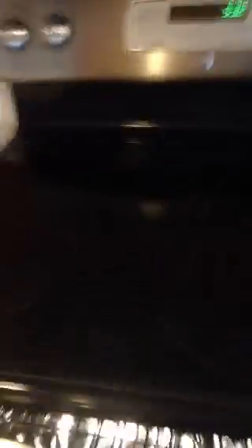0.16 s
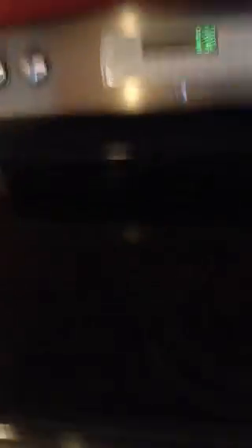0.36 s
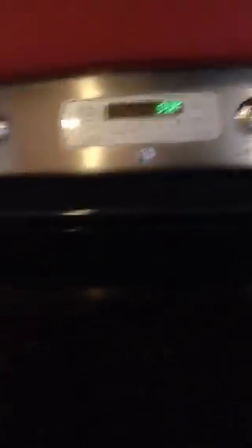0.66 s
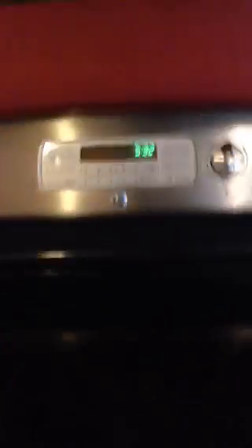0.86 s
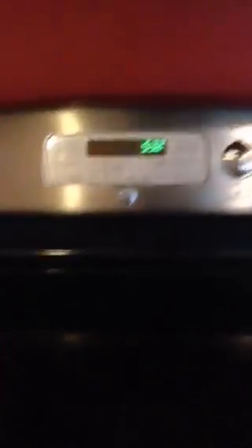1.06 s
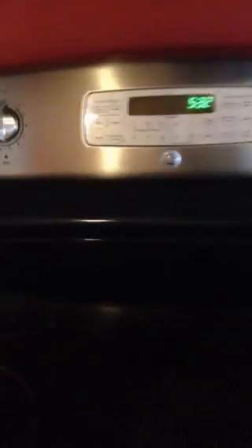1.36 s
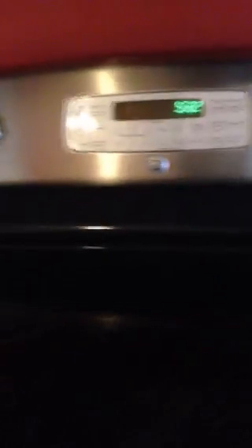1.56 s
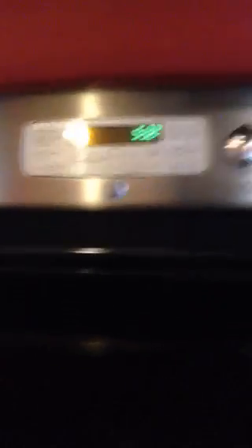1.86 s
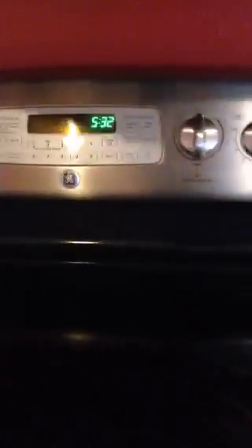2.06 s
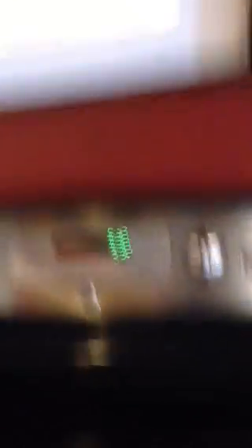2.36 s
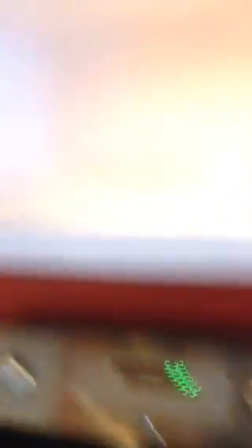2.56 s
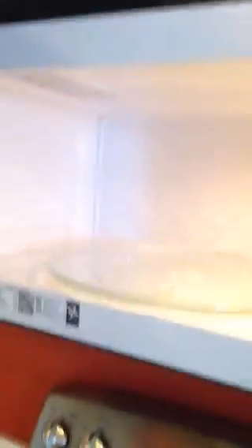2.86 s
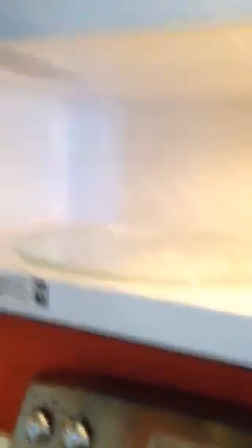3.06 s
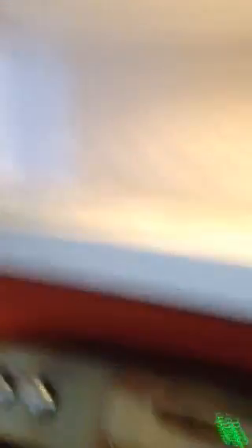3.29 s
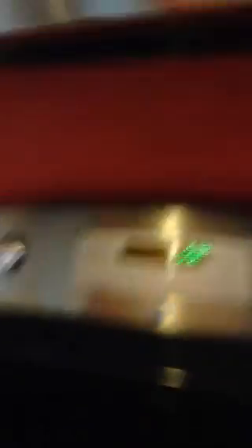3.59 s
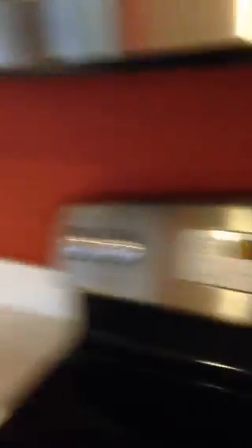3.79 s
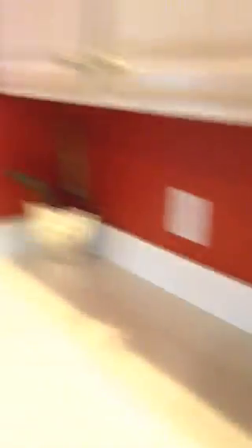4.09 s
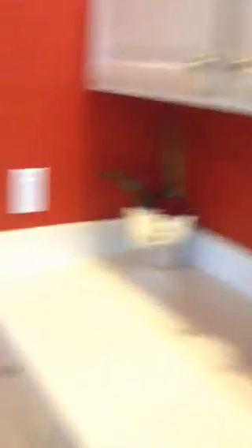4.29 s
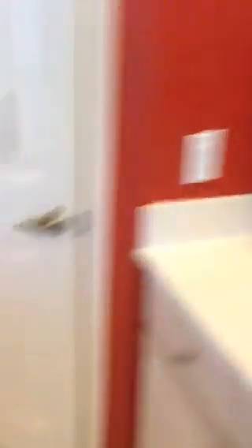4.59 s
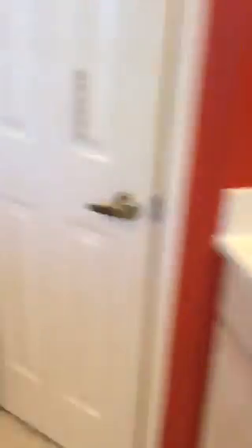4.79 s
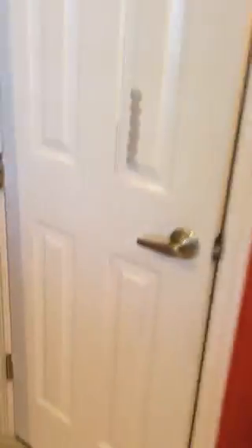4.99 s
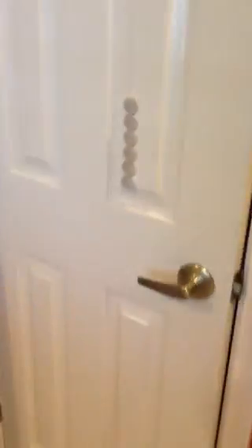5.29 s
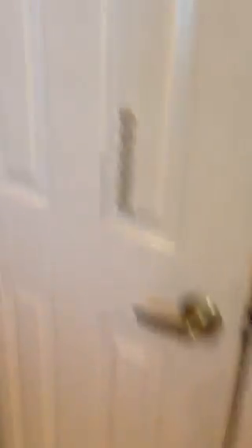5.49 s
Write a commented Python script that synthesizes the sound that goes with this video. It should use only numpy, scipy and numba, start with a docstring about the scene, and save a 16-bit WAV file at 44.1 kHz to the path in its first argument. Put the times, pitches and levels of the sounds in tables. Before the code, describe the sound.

In a small hard-walled kitchen, an oven door scrapes and thuds shut, then a microwave door clatters open and slams loudly.

```python
"""Low handling rumble, appliance hum and air noise come first, in a small, hard-walled kitchen.
An oven door scrapes on its hinge springs, clicks and thuds shut; a microwave door above is tugged, pops open
with a clatter and is slammed; a few light knocks follow. A blow is a crack and rattle of noise plus, on the
doors, decaying modes; sliding parts are random jolts, filtered or resonated. Room echoes surround them.
The microphone's gain ducks at high level and recovers slowly."""
import sys
import numpy as np
from scipy import signal
from scipy.fft import rfft, irfft
from scipy.io import wavfile
from numba import njit

SR = 44100
rng = np.random.default_rng(int(sys.argv[2]) if len(sys.argv) > 2 else 0)


def to_wav(sig):
    """Store sig (one row per channel, or 1-D mono) as 16-bit WAV at the path in sys.argv[1].

    Samples outside -1..1 are clipped; the rate is SR.
    """
    pcm = np.clip(np.atleast_2d(sig), -1, 1) * 32767
    pcm = np.round(pcm).astype(np.int16)
    wavfile.write(sys.argv[1], SR, pcm.T)  # frames by channels


N = 249165
TIME = np.arange(N) / SR  # s


def undb(db):
    """Amplitude ratio: decibels to gain."""
    return 10 ** (np.asarray(db) / 20)


def unit(x):
    """Power normalisation: scale to rms 1."""
    return x / np.sqrt(np.mean(x ** 2))


def at(points, hz):
    """Logarithmic interpolation: read (f/Hz, value) points on a log-frequency axis."""
    f, value = np.transpose(points)
    return np.interp(np.log(np.maximum(hz, 1)), np.log(f), value)


def fader(curve):
    """Level envelope: gain over time from (t/s, level/dB) rows, silent outside them."""
    return undb(np.interp(TIME, *np.transpose(curve), left=-np.inf, right=-np.inf))


def colour(x, points):
    """Spectral shaping: zero-phase filter with the gains of (f/Hz, level/dB) points."""
    hz = np.arange(len(x) // 2 + 1) * SR / len(x)
    return irfft(rfft(x) * undb(at(points, hz)), len(x))


def causal(gain):
    """Minimum phase: the tightest impulse response with these spectral gains, folded in the cepstrum."""
    cepstrum = irfft(np.log(gain))
    half = len(cepstrum) // 2
    folded = np.r_[cepstrum[0], 2 * cepstrum[1:half], np.zeros(half)]
    return irfft(np.exp(rfft(folded)))


def fade(t, t60):
    """Exponential decay: 60 dB down at t60."""
    return np.exp(-np.log(1000) * t / t60)


def ring(hz, t60):
    """Damped free vibration: one struck mode."""
    t = TIME[:int(t60 * SR)]
    return np.sin(2 * np.pi * hz * t) * fade(t, t60)


def add(out, s, sound):
    """Superposition: mix a sound in at time s."""
    start = int(s * SR)
    part = sound[:max(N - start, 0)]
    out[start:start + len(part)] += part


# Tones of the appliance hum, with loud and quiet spots in the room:
# (f/Hz, level/dB at the oven, level/dB at the microwave, level/dB by the wall door)
HUM_TONES = [(57.6, -65, -63, -74.5), (117, -69, -73, -64.5), (229, -72, -71, -81.5),
             (420, -80.5, -81, -87.5)]
# Where the microphone is carried: (t/s, spot: 0 oven, 1 microwave, 2 wall door)
MICROPHONE_WALK = [(1.5, 0.055), (3.0, 1.25), (3.9, 1), (4.7, 2.5)]
# Relative spectrum of the air noise: (f/Hz, level/dB per Hz)
AIR_SPECTRUM = [(20, -11.5), (35, -1), (60, 2.5), (90, -2), (140, -5.5), (200, -7), (320, -12), (550, -16),
                (900, -23), (2000, -23.5), (6000, -24.5), (15000, -27.5)]
# Low handling rumble: (t/s, level/dB)
HANDLING_LEVEL = [(0, -51.5), (.15, -65), (.3, -67.5), (1.2, -60), (2.4, -58.5), (2.7, -77), (4.5, -74.5),
                  (5.65, -76)]
AIR_DB = -62


def background():
    """Spatial variation of a sound field: hum changes along the walk, over steady air noise and rumble."""
    hum = 0
    spot = np.interp(TIME, *np.transpose(MICROPHONE_WALK))
    for hz, *levels in HUM_TONES:
        drift = np.interp(TIME, np.linspace(0, TIME[-1], num=24), rng.standard_normal(size=24))
        level_db = np.interp(spot, np.arange(len(levels)), levels) + 1.5 * drift
        phase = 2 * np.pi * hz * TIME + 0.28 * drift
        hum = hum + np.sqrt(2) * undb(level_db) * np.sin(phase)
    air = undb(AIR_DB) * unit(colour(rng.standard_normal(N), AIR_SPECTRUM))
    rumble_spectrum = [(25, -10.0), (60, -2.0), (130, 2.5), (300, -10.5),
                       (1000, -22.0), (4000, -39), (12000, -58)]
    rumble = unit(colour(rng.standard_normal(N), rumble_spectrum))
    return hum + air + rumble * fader(HANDLING_LEVEL)


# Reverberation time of the room: (f/Hz, T60/s)
REVERBERATION_TIME = [(60, 0.71), (150, 0.59), (400, 0.6), (1000, 0.93), (2500, 0.82), (5000, 0.78),
                      (8000, 0.41), (15000, 0.2)]
# Reverberant level against the direct sound: (f/Hz, level/dB)
REVERBERANT_LEVEL = [(40, -11), (130, -9), (300, -5.5), (1000, -10), (2500, -14.5), (6000, -11.5),
                     (14000, -14)]


def kitchen(x, build_s):
    """Diffuse reverberation: noise bands build up in milliseconds and decay at their own T60."""
    t = TIME[:SR]
    hz = np.arange(SR // 2 + 1)
    noise = rfft(rng.standard_normal(SR)) * undb(at(REVERBERANT_LEVEL, hz))
    centres = np.geomspace(60, 15000, num=20)
    tail = 0
    for share, t60 in zip(np.eye(len(centres)), at(REVERBERATION_TIME, centres)):
        band = irfft(noise * np.interp(hz, centres, share), SR)
        shape = fade(t, t60) * (1 - np.exp(-(t / build_s) ** 2))
        tail = tail + band * shape / np.linalg.norm(shape)
    return signal.fftconvolve(x, tail)[:N]


HARDNESS_PIVOT_HZ = 1275
CONTACT_OCTAVES = (-2.87, 2.65)  # range around the pivot in which hardness shapes a blow


def force(hz, hardness, arch_db):
    """Contact stiffness: soft contacts tip the force spectrum (dB) to bass, hard ones to treble.

    A parabola of arch_db per squared octave is subtracted from that slope."""
    octave = np.clip(np.log2(hz / HARDNESS_PIVOT_HZ), *CONTACT_OCTAVES)
    return hardness * octave - arch_db * octave ** 2


def clatter(t60, crack):
    """Multiple impact: a sharp crack and dying tiny bounces, their energy spread evenly over frequency."""
    t = TIME[:SR // 4]
    bounces = unit(rng.standard_normal(len(t)) * undb(3.5 * rng.standard_normal(len(t))))
    rattle = bounces * fade(t, t60)
    rattle[0] = crack
    white = irfft(np.exp(1j * np.angle(rfft(rattle))), len(t))  # keep only the phase
    even = white * fade(t, 4 * t60)
    return even * np.linalg.norm(rattle) / np.linalg.norm(even)


def blows(table, modes, panel, modes_db, crack, arch_db):
    """Impact excitation: each contact cracks, rattles the crowded panel modes and rings the strong ones."""
    out = np.zeros(N)
    hz = np.maximum(np.fft.rfftfreq(8192, 1 / SR), 20)
    per_octave = np.sqrt(SR / np.sqrt(2) / hz)  # equal energy in each octave
    for s, level, hardness, t60 in table:
        body = causal(per_octave * undb(level + force(hz, hardness, arch_db) + at(panel, hz)))
        add(out, s, signal.fftconvolve(clatter(t60, crack), body))
        for f, db, mode_t60 in modes:
            gain = undb(modes_db + db + level + force(f, hardness, arch_db))
            add(out, s, gain * ring(f, mode_t60))
    return out


def small_part(x, low_hz):
    """Radiation cutoff: a small part radiates little below its lowest resonance."""
    return signal.sosfilt(signal.butter(4, low_hz, "high", fs=SR, output="sos"), x)


# Light knocks across the room:
# (t/s, level/dB, hardness/dB per octave, nominal rattle T60/s, lowest f/Hz of the part struck)
KNOCKS = [(4.94, -69.5, 5, 0.13, 400), (4.9973, -52.5, -4.5, 0.11, 190), (5.0776, -44.5, 1, 0.12, 760),
          (5.549, -61, -5, .09, 190), (5.574, -66.5, 5, 0.077, 600), (5.645, -58, -5, 0.056, 190)]
# Relative colour of their rattle: (f/Hz, level/dB)
KNOCK_SPECTRUM = [(30, -16), (130, -2), (300, 1), (600, -3.5), (1200, -1), (2000, -7), (2550, 1),
                  (3000, -14), (7000, -1), (15000, -14)]


def light_knocks():
    """Impact without modal ringing: faint knocks and clicks with no cabinet boom."""
    total = 0
    for *contact, low_hz in KNOCKS:
        knock = blows([contact], [], KNOCK_SPECTRUM, modes_db=0, crack=8.1, arch_db=2.0)
        total = total + small_part(knock, low_hz)
    return total


def friction(rate, spread_db):
    """Stick-slip: dense, uneven random jolts, rate per second."""
    jolts = (rng.random(N) < rate / SR) * rng.standard_normal(N)
    return jolts * undb(spread_db * rng.standard_normal(N))


def stroke(table):
    """Exponential growth and decay: each stroke rises by 60 dB, holds and dies away."""
    effort = 0
    for s, db, rise, hold, release in table:
        growth = fade(np.maximum(s - TIME, 0), rise)
        decay = fade(np.maximum(TIME - s - hold, 0), release)
        effort = effort + undb(db) * growth * decay
    return effort


def rub(spectrum, strokes):
    """Sliding friction: coloured jolts that follow the effort of the strokes."""
    return unit(colour(friction(rate=5000, spread_db=1.5), spectrum)) * stroke(strokes)


# Stroke tables: (t/s at full strength, level/dB, 60 dB rise/s, hold/s, release T60/s)
# A hand brushing the door handle
BRUSH_STROKES = [(1.13, -57.5, 0.27, .025, 0.19)]
# Its relative spectrum: (f/Hz, level/dB per Hz)
BRUSH_SPECTRUM = [(300, -25), (1200, -12), (2200, 0.5), (4000, -6), (7000, -12), (15000, -18.5)]


def hand_brush():
    """Sliding friction of skin on the handle: a short, soft hiss."""
    return rub(BRUSH_SPECTRUM, BRUSH_STROKES)


# The microwave door swishing shut: stroke columns as above
SWING_STROKES = [(3.719, -66.5, .4, .01, 0.78), (3.998, -40.5, 0.13, .002, 0.023)]
# Its relative spectrum: (f/Hz, level/dB per Hz)
SWING_SPECTRUM = [(30, 11), (70, 0), (220, -6), (450, 1), (1000, -3.5), (2000, -2.5), (3000, -1.5),
                  (5000, -3), (9000, -15), (15000, -43.5)]


def door_swing():
    """Sliding friction of the closing door: a swish weighted to the bass."""
    return rub(SWING_SPECTRUM, SWING_STROKES)


# The microwave's latch hook, set shivering when the door is pushed: stroke columns as above
SHIVER_STROKES = [(3.831, -39.5, .005, .005, 0.25)]
# Its relative spectrum: (f/Hz, level/dB per Hz)
SHIVER_SPECTRUM = [(300, -34), (2800, -19), (4000, -2), (5100, 3), (5900, -5.5), (6800, -11),
                   (15000, -31.5)]


def latch_shiver():
    """Sliding friction in a small hook: a brief bright fizz."""
    return rub(SHIVER_SPECTRUM, SHIVER_STROKES)


# The microwave hinge as the door swings open: stroke columns as above
SQUEAK_STROKES = [(2.27, -66, .3, .02, 0.25), (2.375, -68, 0.093, 0.045, 0.11)]
SQUEAK_HZ, SQUEAK_T60_S = 2150, 0.032


def hinge_squeak():
    """Friction-excited resonance: slips keep one damped mode sounding."""
    slips = friction(rate=2700, spread_db=0.5)
    squeak = unit(signal.fftconvolve(slips, ring(SQUEAK_HZ, SQUEAK_T60_S))[:N])
    return stroke(SQUEAK_STROKES) * squeak


# Effort on the oven hinge, before the scrape and spring gains: stroke columns as above
OVEN_HINGE_STROKES = [(.55, -43.5, 0.28, 0.091, .6), (.91, -58, 0.3, 0.0065, 0.49),
                      (1.06, -59, 0.52, 0.0088, .9)]
# Relative spectrum of the scrape: (f/Hz, level/dB per Hz)
SCRAPE_SPECTRUM = [(30, -4.5), (60, 2), (180, 10), (400, 2), (800, -5), (1200, -7), (1450, -4.5), (2100, 2),
                   (2700, -6), (4200, -9), (5200, -14), (9000, -26), (15000, -31)]
# Modes of the hinge springs: (f/Hz, relative level/dB, T60/s)
HINGE_SPRING_MODES = [(1080, -5.5, 0.025), (1362, -1.5, 0.21), (1448, 1.5, 0.17), (1562, 5.5, 0.038),
                      (1714, 0, 0.031), (1847, 3, 0.03), (2040, 2, 0.073), (4330, -6, 0.015)]


def oven_hinge():
    """Friction-excited resonance: the hinge scrapes and its springs sing when pulled hard."""
    slips = friction(rate=2700, spread_db=0.5)
    effort = stroke(OVEN_HINGE_STROKES)
    springs = 0
    for f, db, t60 in HINGE_SPRING_MODES:
        springs = springs + undb(db) * unit(signal.fftconvolve(slips, ring(f, t60))[:N])
    scrape = undb(3.5) * unit(colour(slips, SCRAPE_SPECTRUM))
    # the springs fade faster than the scrape as effort drops
    singing = undb(1.5) * unit(springs) * np.sqrt(effort / effort.max())
    return effort * (scrape + singing)


# Thin steel parts that sing on after the pop and the slam: (t/s, f/Hz, level/dB, T60/s)
STEEL_RINGS = [(1.9243, 690.3, -65.5, 3.7), (4.031, 340.5, -46, 2.91)]


def after_rings():
    """Light damping: thin steel gives long, pure rings."""
    out = np.zeros(N)
    for s, hz, db, t60 in STEEL_RINGS:
        add(out, s, undb(db) * ring(hz, t60))
    return out


# Contact tables: (t/s, level/dB, hardness/dB per octave, nominal rattle T60/s)
# The oven door's small catch
CATCH_CONTACTS = [(.4396, -30, -1.5, 0.071)]
# The oven door meets its frame and jolts on its hinges
OVEN_CONTACTS = [(.459, -39.5, -1, 0.34), (.4665, -40, -3.5, 0.17), (.4932, -40, -1, 0.047),
                 (.548, -56.5, -5, 0.18), (.648, -57, -1, 0.39)]
# Strong modes of the oven: (f/Hz, relative level/dB, T60/s)
OVEN_STRONG_MODES = [(54.3, -17, 0.15), (90, 0, .09), (125, 12.5, 0.1), (214, 4, 0.062), (250, -1, 0.09),
                     (1950, -4, 0.12), (3900, 8, .03)]
# Relative colour of its dense panel rattle: (f/Hz, level/dB)
OVEN_PANEL = [(30, -5), (70, 11), (140, -3), (240, 7.5), (380, -11), (600, -3.5), (1200, -5.5), (2000, 0.5),
              (2900, 0.5), (4000, 7), (5500, -2), (8000, 1), (10000, -7.5), (15000, -14)]
CATCH_LOW_HZ = 1780  # too small to radiate well below this


def oven_door():
    """Modal excitation: the catch clicks, thin and bright, just before the door thuds home."""
    catch = blows(CATCH_CONTACTS, OVEN_STRONG_MODES, OVEN_PANEL, modes_db=-11.0, crack=2.4, arch_db=-0.9)
    thuds = blows(OVEN_CONTACTS, OVEN_STRONG_MODES, OVEN_PANEL, modes_db=-3.0, crack=7.9, arch_db=0.84)
    return small_part(catch, CATCH_LOW_HZ) + thuds


REBOUND_S, REBOUND_BRIGHTENS_DB_PER_OCTAVE = .0215, 0.67  # the door chatters on its latch spring


def clunks(table, hook_lag_s, second_hook_db, count):
    """Rebound: two latch hooks land just apart, then the door returns, weaker each time.

    The hardness slope also changes by a fixed step at each rebound."""
    contacts = []
    for s, db, hardness, t60, rebound_db in table:
        contacts.append((s, db, hardness, t60))
        contacts.append((s + hook_lag_s, db + second_hook_db, hardness, t60))
        for k in range(1, count + 1):
            slope = hardness + k * REBOUND_BRIGHTENS_DB_PER_OCTAVE
            contacts.append((s + k * REBOUND_S, db + k * rebound_db, slope, t60))
    return contacts


# Single contacts as the microwave door is tugged and let go: contact columns as above
OPENING_CONTACTS = [(1.2085, -58, -3.5, 0.07), (1.2726, -57.5, 4, 0.064), (1.284, -53.5, -1.5, 0.16),
                    (1.337, -48, -1.5, 0.14), (1.3794, -49.5, -2, 0.16), (1.5764, -48, -0.35, 0.13),
                    (1.705, -58.5, -9.5, 0.09), (1.8425, -58, -0.65, 0.23), (1.8533, -52.5, -4.5, 0.52),
                    (1.8975, -39.5, 0, .16), (1.9125, -28, -1.5, 0.078), (1.956, -46, -9.5, 0.11),
                    (1.975, -49.5, -8.5, 0.1), (2.125, -66, -9.5, 0.057), (2.2, -61.5, 3, 0.071)]
# The door pulls against both latch hooks: contact columns, then change per rebound/dB
OPENING_HOOKS = [(1.2935, -39, -1.63, 0.08, -5.5), (1.42, -50.5, -4.5, .07, -8.5),
                 (1.6562, -50, -6.5, .14, -9), (1.918, -25, 0.33, 0.15, -8.5)]
# Single contacts as it is pushed and slammed: contact columns as above
CLOSING_CONTACTS = [(2.8026, -73.5, 7, .0085), (3.4322, -67, 7.5, 0.014), (3.884, -53, -8, 0.25),
                    (4.0012, -24, -0.7, 0.2), (4.0235, -23.5, -6.5, 0.16), (4.06, -27.5, -2, 0.35)]
# Both hooks meet the latch, then snap home: contact columns, then change per rebound/dB
CLOSING_HOOKS = [(3.831, -40.5, -3.5, 0.2, -6), (4.0272, -12, -2.5, .1, -17)]
# Strong modes with the door free: (f/Hz, relative level/dB, T60/s)
FREE_MODES = [(65.6, -14.5, 0.11), (102, -3, .14), (107.1, 3.5, 0.34), (142, -5, 0.082), (191, -5, 0.1),
              (206, -10, 0.075), (333, -10, .18), (540, -17.5, 0.39), (658, -11.5, 0.33), (1030, -4, 0.15),
              (1101, -2, 0.083), (1408, -18, 0.35), (1685, -8, 0.25), (1850, -24.5, 0.28),
              (2280, -5, 0.073), (2220, -11.5, .18), (2620, -12.5, .18)]
# Strong modes with the door latched: (f/Hz, relative level/dB, T60/s)
SHUT_MODES = [(65.7, -16.5, .15), (121.2, 1.5, 0.11), (127.5, -1.5, 0.03), (167, -4.5, 0.051),
              (201, 1.5, 0.087), (301, -6, 0.28), (320, -7, 0.12), (389.1, -5.5, 0.21), (582, -10.5, 0.19),
              (701, -28.5, 0.31), (992, -17.5, 0.3), (1177, -9, 0.32), (1469, -9, 0.16), (2210, -20, 0.23),
              (2500, -11, 0.078)]
# Relative colour of the panel rattle on opening: (f/Hz, level/dB)
OPENING_PANEL = [(30, -21), (65, -5), (130, 4), (260, -3.5), (500, -1), (800, -1), (1100, -0.5),
                 (2200, 2.5), (3000, 1), (5500, 2), (9000, -2), (15000, -11)]
# Relative colour of the panel rattle on closing: (f/Hz, level/dB)
CLOSING_PANEL = [(30, -53.5), (65, -4), (130, 0.5), (280, -2), (500, -6.5), (1100, -3.5), (2200, 0.5),
                 (3000, -1.5), (5200, 2), (9000, 0), (15000, -8.5)]


def microwave_door():
    """Boundary conditions: the freed door and the latched one ring in different modes."""
    opening = OPENING_CONTACTS + clunks(OPENING_HOOKS, hook_lag_s=.0063, second_hook_db=1.5, count=3)
    closing = CLOSING_CONTACTS + clunks(CLOSING_HOOKS, hook_lag_s=.0055, second_hook_db=0.0, count=2)
    opened = blows(opening, FREE_MODES, OPENING_PANEL, modes_db=-3.0, crack=4.1, arch_db=0.43)
    slammed = blows(closing, SHUT_MODES, CLOSING_PANEL, modes_db=-1, crack=2.4, arch_db=0.74)
    return opened + slammed


def scene():
    """Direct-to-reverberant ratio: doors share one room; the further knocks are wetter."""
    sliding = oven_hinge() + hinge_squeak() + hand_brush() + door_swing() + latch_shiver()
    doors = oven_door() + microwave_door() + sliding
    knocks = light_knocks()
    room = kitchen(doors + undb(4) * knocks, build_s=.008)
    return (doors + knocks + after_rings() + room + background())[None]


@njit
def follow(x, attack, release):
    """Envelope detection: a level that rises quickly and sinks slowly."""
    out, e = np.empty(len(x)), 0.
    for i in range(len(x)):
        e += (abs(x[i]) - e) * (attack if abs(x[i]) > e else release)
        out[i] = e
    return out


TOP_HZ = 15500  # upper band limit


def record(dry):
    """Dynamic range compression: bass cut, ducking with slow recovery, rounded peaks, then a treble limit."""
    sound = signal.sosfilt(signal.butter(2, 41, "high", fs=SR, output="sos"), dry)
    attack_s, release_s = 0.0012, 1.3
    peak = follow(sound[0], 1 / (attack_s * SR), 1 / (release_s * SR))
    held = sound / np.maximum(peak / .5, 1)  # gain falls only above an envelope of 0.5
    ceiling = .8
    rounded = ceiling * np.tanh(held / ceiling)
    return signal.sosfilt(signal.ellip(10, .2, 80, TOP_HZ, fs=SR, output="sos"), rounded)


dry = scene()
out = record(dry)
to_wav(out)
```